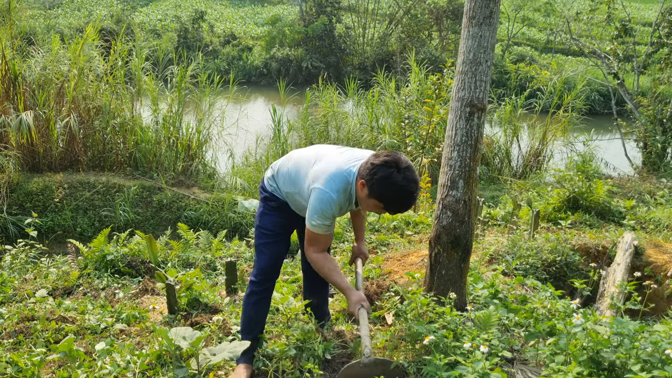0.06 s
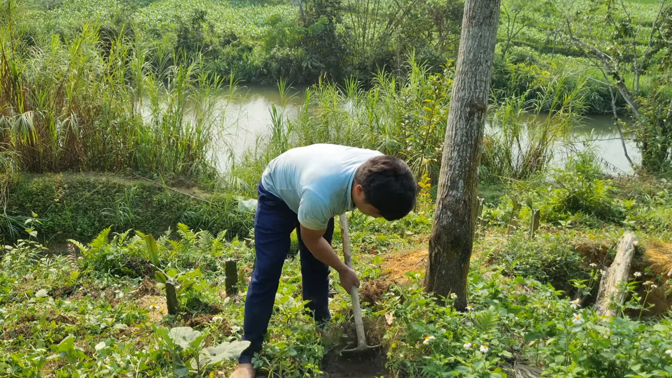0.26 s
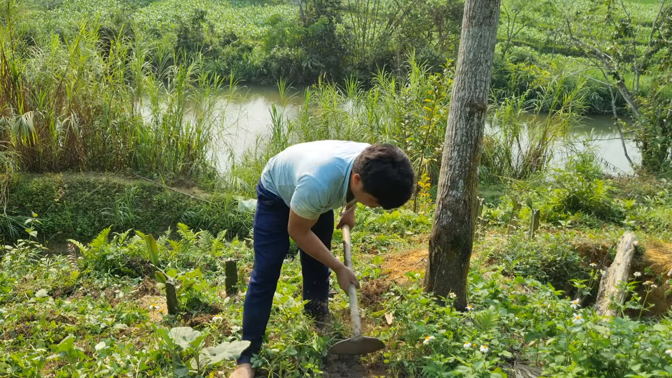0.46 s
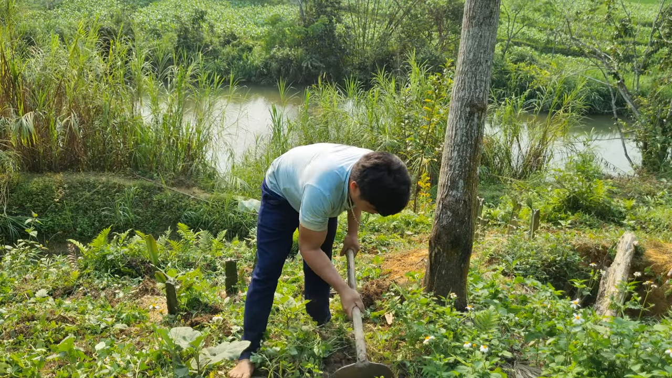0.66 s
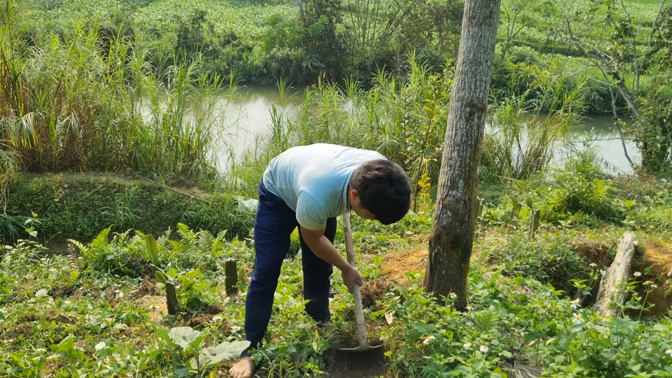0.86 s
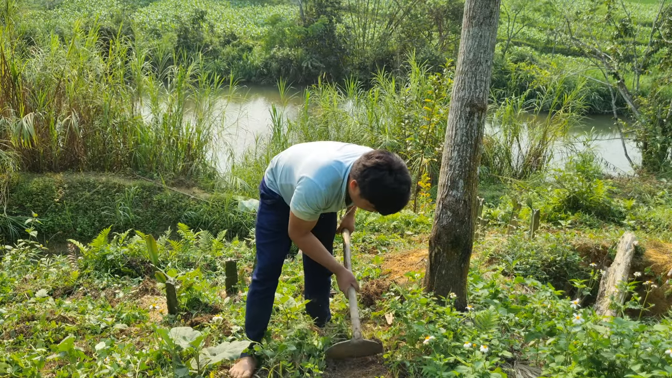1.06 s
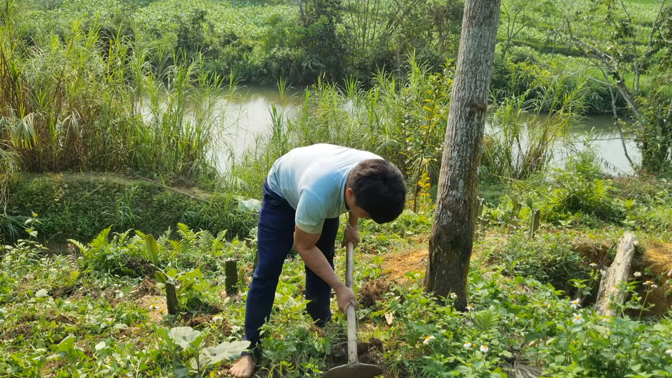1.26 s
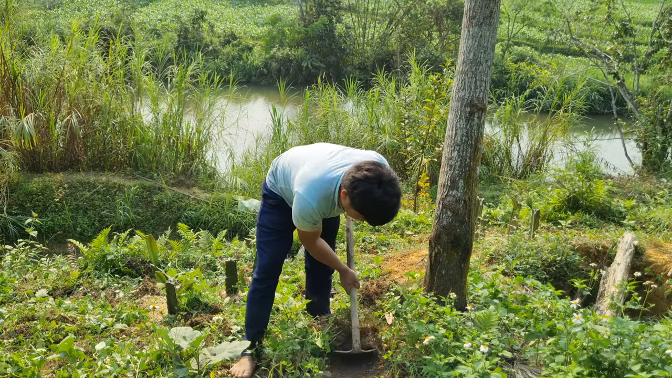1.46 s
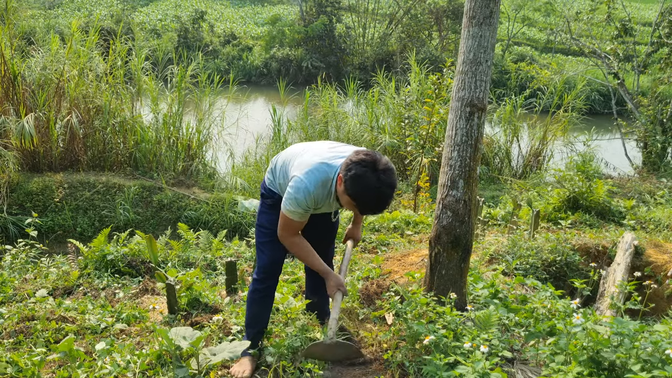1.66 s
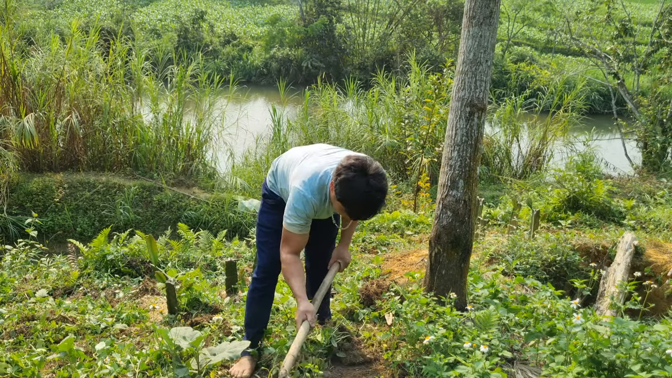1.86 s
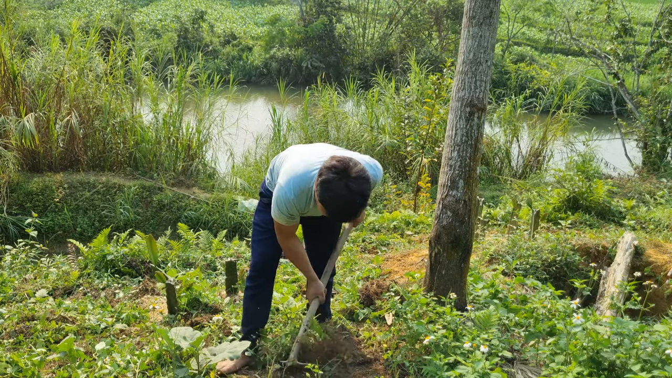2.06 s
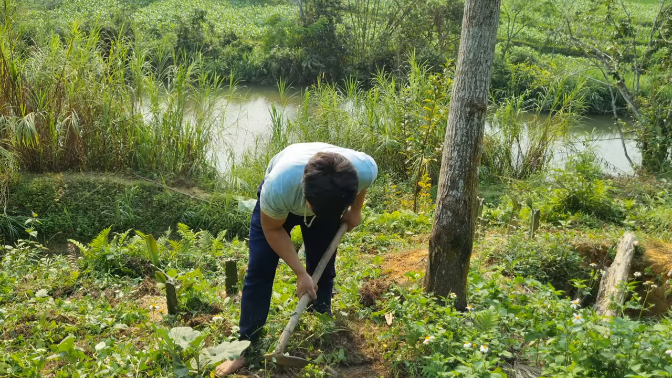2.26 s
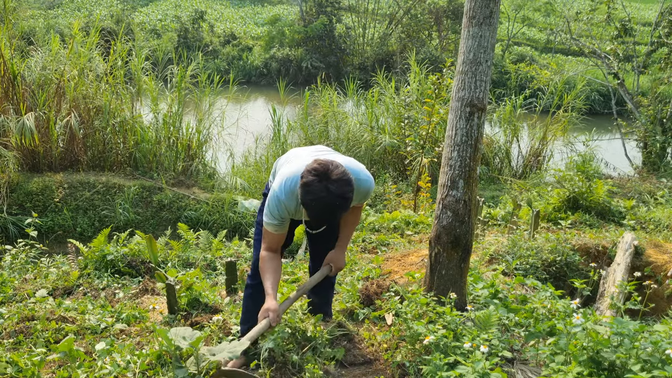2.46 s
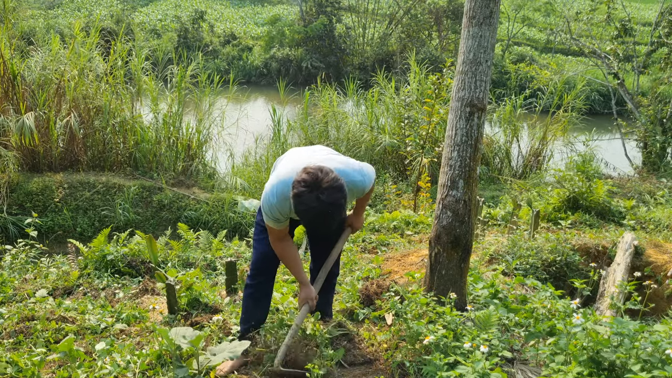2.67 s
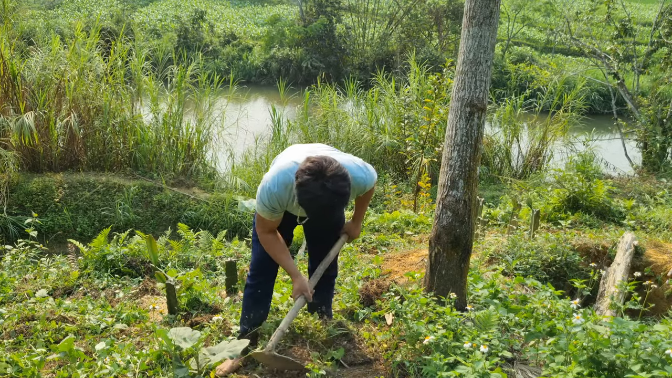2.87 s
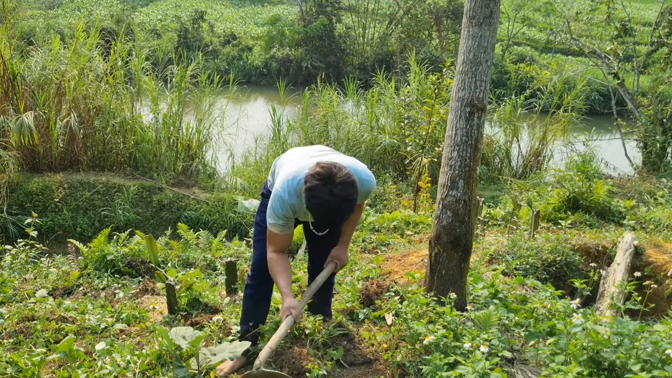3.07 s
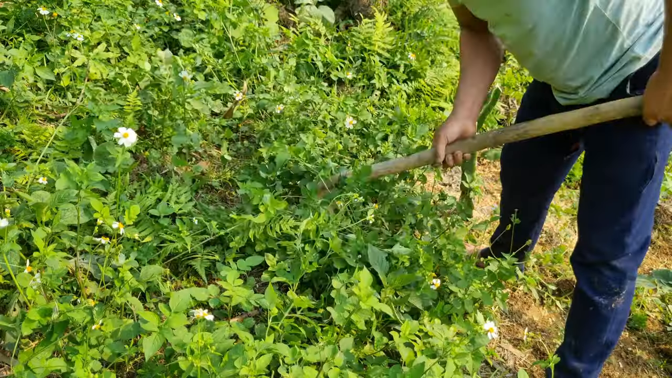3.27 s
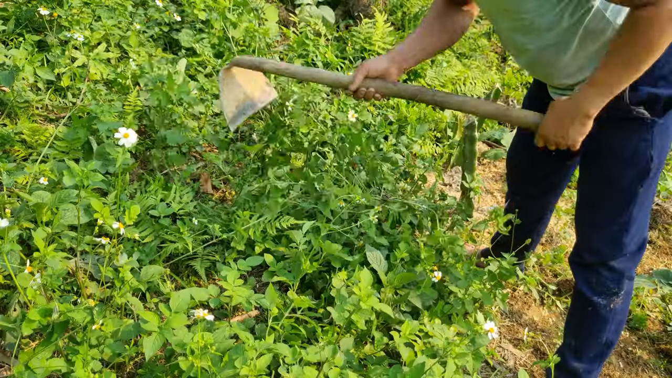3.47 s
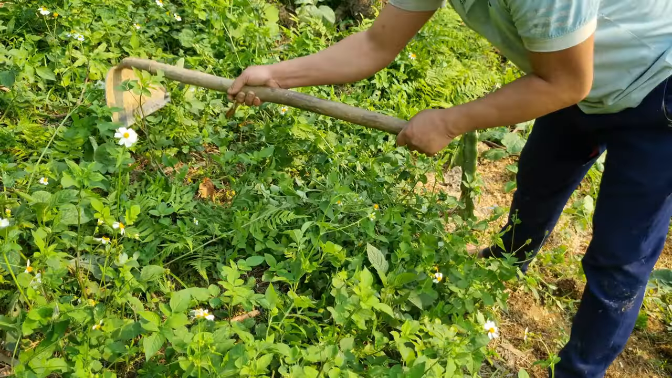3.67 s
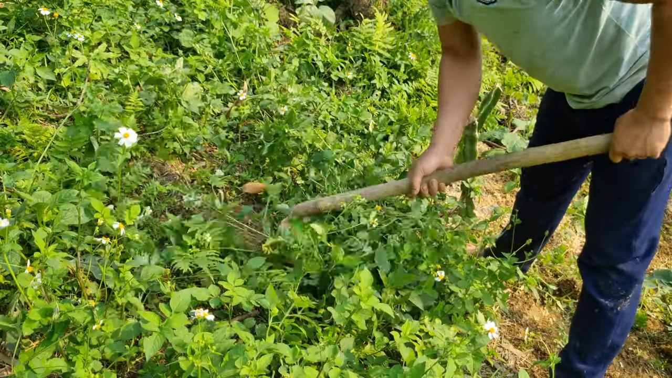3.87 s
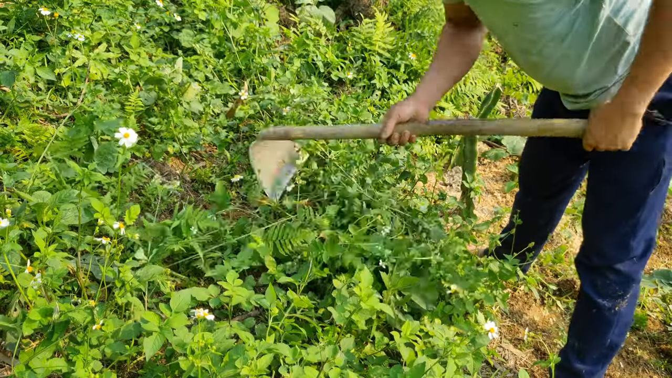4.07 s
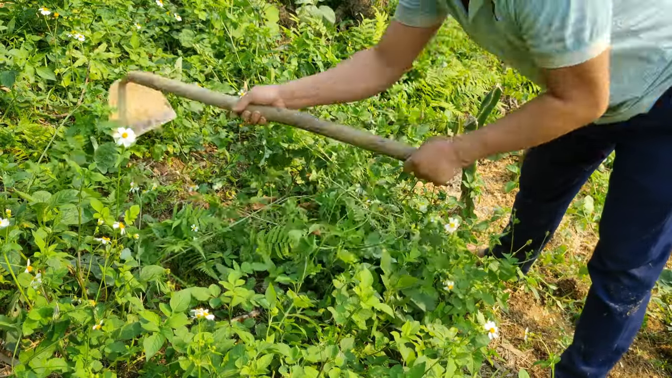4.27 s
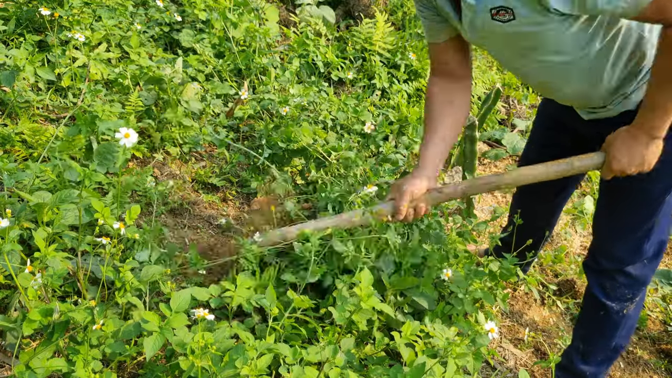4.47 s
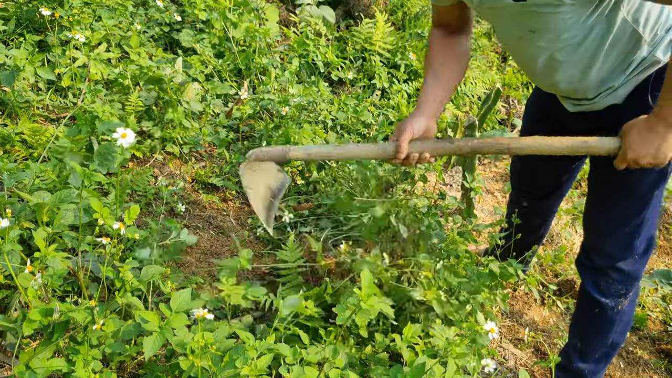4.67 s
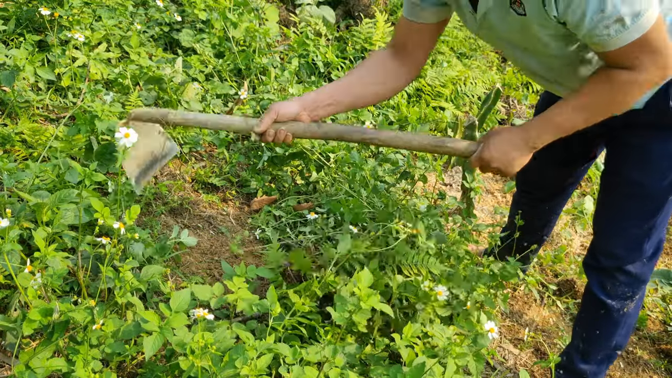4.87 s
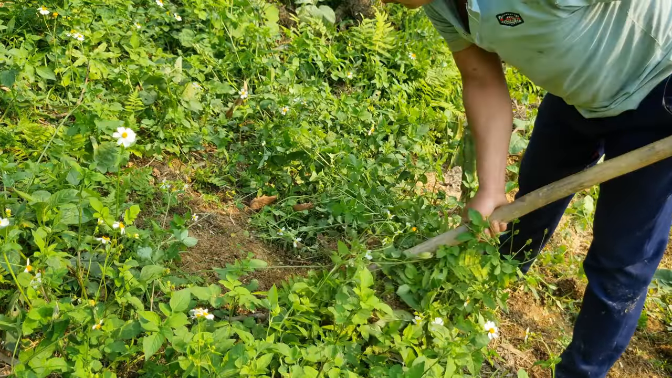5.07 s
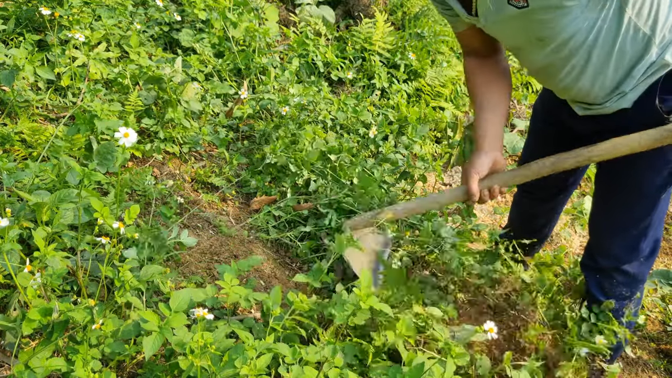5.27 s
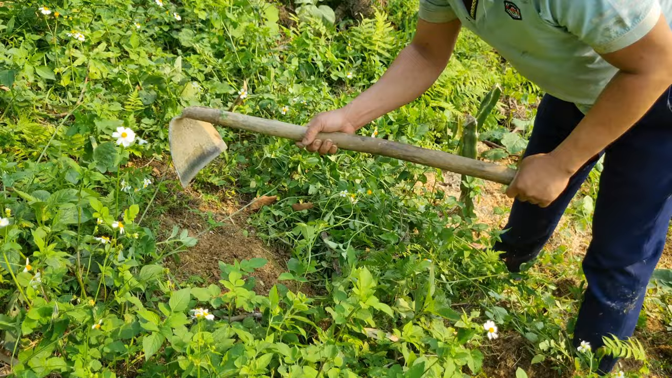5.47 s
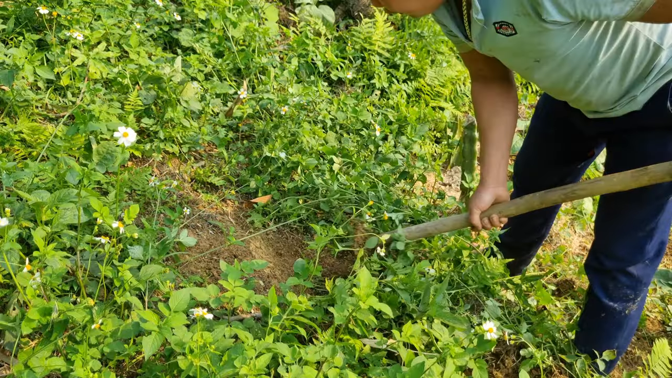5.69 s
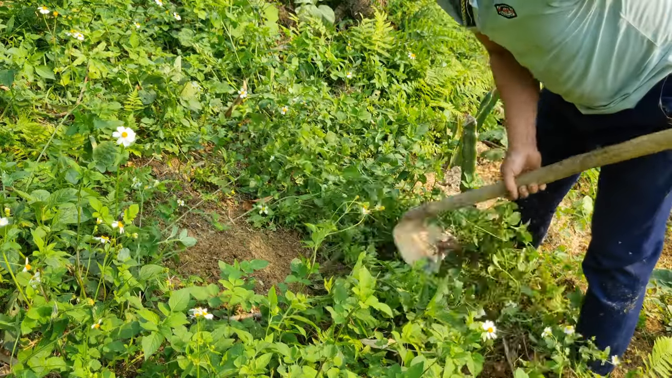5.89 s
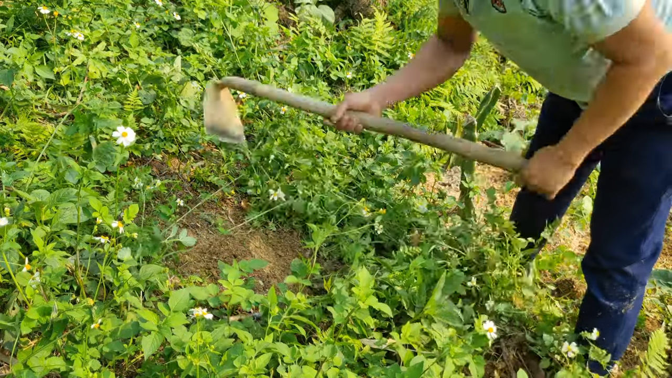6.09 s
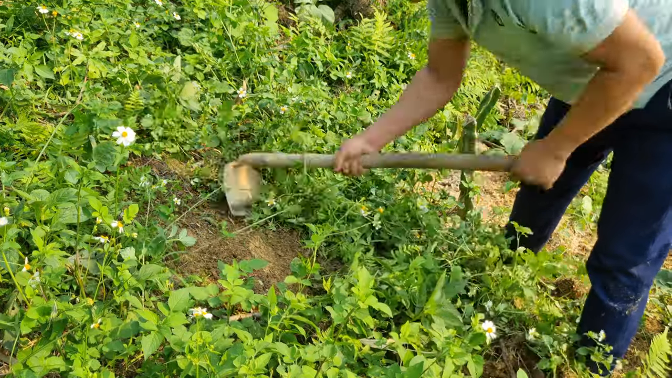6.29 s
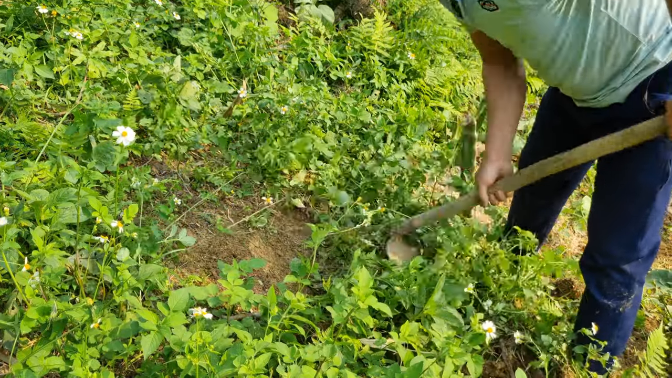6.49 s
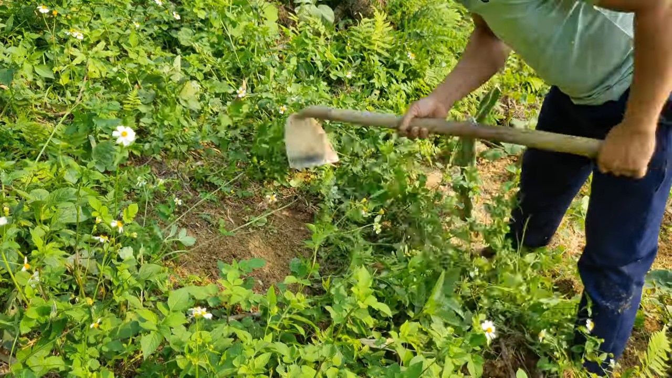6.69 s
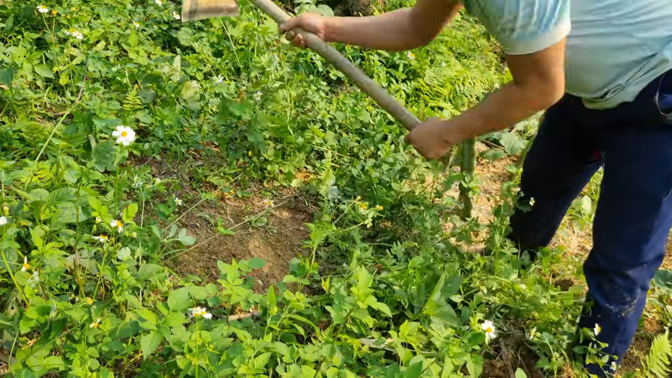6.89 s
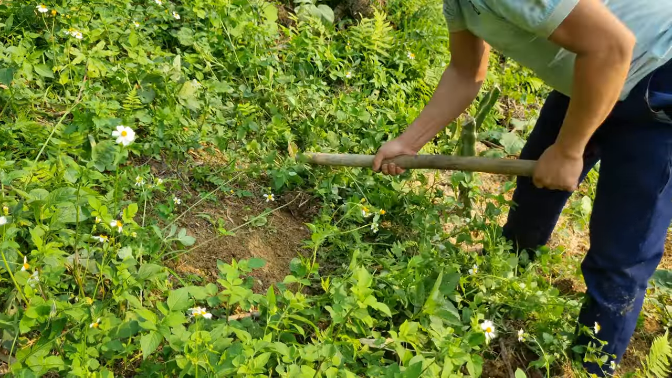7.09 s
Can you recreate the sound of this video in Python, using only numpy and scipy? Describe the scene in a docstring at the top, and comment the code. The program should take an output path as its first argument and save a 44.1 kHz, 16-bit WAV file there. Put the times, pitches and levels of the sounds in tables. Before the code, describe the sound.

Regular hoeing in open air, in wide stereo. Distant chops come first, each a short gritty crunch with a soft thud and a fading rustle, plus woody pops early on. Around three seconds the perspective jumps near, and the blows become louder, sharper and more metallic, tearing through stems and dragging soil and leaves. The last blows are strongest. Very soft breeze and thin bird notes stay in the background.

```python
"""A hoe chops twelve times into dry soil and vines in a garden, heard first from afar, then from near.
Noisy grains of grit and stems strike the steel blade and ring its modes; damped low swings thud in
the ground, and shaped noise rustles like leaves in each pull. Small hollow pops are short decaying
tones, bird notes are gliding sines, and outdoor hiss and low breeze are drifting coloured noise.
Two microphone ports, alike in the bass and less so in most of the treble, make the stereo."""
import sys
import numpy as np
from scipy import signal
from scipy.fft import rfft, irfft, next_fast_len
from scipy.io import wavfile
from scipy.ndimage import uniform_filter1d

SR = 44100
rng = np.random.default_rng(int(sys.argv[2]) if len(sys.argv) > 2 else 0)


def digitize_waveform(pressure):
    """Quantize a signal to 16-bit integers and store it at the path in sys.argv[1].

    Rows of a 2-D input are taken as channels; values are limited to [-1, 1].
    """
    field = np.atleast_2d(pressure).T
    bounded = np.clip(field, -1, 1)
    quanta = np.round(bounded * 32767).astype(np.int16)
    wavfile.write(sys.argv[1], SR, quanta)


N = 314874
NEAR_S = 3.265  # the hoe is heard from near after this time


def gain_of(db):
    """Amplitude factor of a level in dB."""
    return 10 ** (np.asarray(db) / 20)


def evened(x):
    """Scale to an RMS of one."""
    return x / np.sqrt(np.mean(x ** 2) + 1e-20)


def read(points, hz):
    """Every column of a table at the frequencies hz, on a log axis."""
    f, *columns = np.transpose(points)
    return np.squeeze([np.interp(np.log(hz + 1), np.log(f + 1), c) for c in columns])


def add(mix, s, sound):
    """Lay a sound into the mix at s seconds, cut off at the end."""
    part = mix[..., round(s * SR):][..., :sound.shape[-1]]
    part += sound[..., :part.shape[-1]]


def coloured(x, points):
    """Causal minimum-phase filter of unit energy with the given spectrum."""
    log_gain = read(points, abs(np.fft.fftfreq(4096, 1 / SR))) * np.log(10) / 20
    spectrum = np.exp(log_gain - 1j * signal.hilbert(log_gain).imag)
    taps = np.fft.ifft(spectrum).real[:2048]
    return signal.oaconvolve(x, taps / np.linalg.norm(taps))[:N]


def ring(x, hz, width):
    """One damped resonance of the given width in Hz, scaled to unit energy."""
    r, turn = np.exp(-np.pi * width / SR), 2 * np.pi * hz / SR
    strength = np.sin(turn) * np.sqrt(2 * (1 - r * r))
    return signal.lfilter([strength], [1, -2 * r * np.cos(turn), r * r], x)


def drift(count, per_s, depth_db):
    """Random gain curves with per_s new values a second, joined by straight lines."""
    steps = np.arange(0, N / SR * per_s + 2)
    gains = gain_of(depth_db * rng.standard_normal((count, len(steps))))
    return [np.interp(np.arange(N) / SR * per_s, steps, g) for g in gains]


def air():
    """Distant leaves, insects and breeze: noise with drifting patches."""
    # spectrum of the open air: (f/Hz, relative level per Hz/dB)
    air_spectrum = [(15, -42), (25, -1), (76, -11.5), (317, -11), (394, -7), (1160, -15), (1890, -7),
                    (3520, -8.5), (4490, -5), (8360, -6.5), (11900, -14.5), (14400, -9.5), (16000, -6)]
    frames, hz = N // 256 + 5, np.fft.rfftfreq(1024, 1 / SR)
    real, imaginary, patches = rng.standard_normal((frames, 513, 3)).T
    patches = uniform_filter1d(patches, size=12, axis=0)  # over frequency
    patches = evened(uniform_filter1d(patches, size=20, axis=1))  # over time
    z = (real + 1j * imaginary) * gain_of(read(air_spectrum, hz)[:, None] + 2.0 * patches)
    hiss = signal.istft(z, nperseg=1024, noverlap=768)[1][:N]
    return gain_of(-60) * evened(hiss)


def strokes():
    """Slow level of scrape, treble, weight and rumble: way in, bite, fading pull, and brushed leaves."""
    # one row a stroke: (bite t/s, way in through the leaves/s, bite length/s, scrape level/dB,
    # treble level above it/dB, crunch level above it/dB, bite t60/s, pull level/dB,
    # pull treble level above it/dB, pull t60/s, pull crunch level above it/dB)
    stroke_rows = [(0.174, 0.064, 0.02, -36.5, 1.5, -4, 0.21, -52, 8.5, 0.52, 4.5),
                   (0.786, 0.023, .005, -36, -2, -7, 0.29, -50.5, 5.5, 0.51, -11),
                   (1.357, 0.022, 0.015, -36.5, -1, 5.5, 0.1, -53.5, 4, 0.94, 2),
                   (1.949, 0.013, .01, -38, 5.5, 4, 0.26, -40.5, 3, .7, -1.5),
                   (2.569, 0.031, 0.0037, -33, 3, -2.5, 0.37, -47.5, -21, 0.77, -0.5),
                   (3.198, 0.032, 0.0069, -33.5, 1, 8.5, 0.1, -54, 4.5, 1.46, -7),
                   (3.739, 0.066, 0.0098, -33, 6, 1.5, 0.54, -39, 5, 0.68, -5),
                   (4.372, 0.068, 0.029, -31, 3.5, -3, 0.23, -52, 6.5, 3.86, -2),
                   (4.988, 0.016, 0.022, -29.5, 2, -6.5, 0.42, -41, 7, 1.41, 0.5),
                   (5.615, 0.011, 0.026, -30.5, 1.5, -7, 0.42, -42.5, 6.5, 1.57, -5.5),
                   (6.317, 0.035, 0.029, -29.5, 5, -15, 0.067, -38.5, 3.5, 0.94, -4.5),
                   (7.077, 0.049, 0.0056, -25.5, 2.5, 1.5, 0.22, -37, -12, 1., -11)]
    # leaves and stems brushed between strokes: (middle t/s, length between the -20 dB points/s,
    # scrape level/dB, treble level above it/dB)
    rustles = [(0.09, 0.24, -65, 7), (0.513, 0.44, -58.5, 1.5), (0.85, 0.079, -44.5, -3),
               (1.194, 0.2, -62, -4), (1.477, 0.069, -41.5, -8), (1.527, .12, -53.5, -4),
               (1.786, 0.15, -57.5, 2), (2.347, 0.3, -58.5, 1), (2.85, 0.29, -63, 7),
               (4.02, 0.057, -57, -8), (4.587, 0.1, -51, 3), (5.357, .3, -51, 7.5), (5.706, 0.1, -40, 9.5),
               (6.155, 0.13, -54.5, -1), (6.451, 0.11, -42.5, 0.5), (6.767, 0.35, -57, 0.5)]
    entry_db, entry_crunch = -31, 3.1  # start of the way in; the soil comes in this much more steeply
    lift_s, lift_t60 = 0.032, 0.3  # the pull dies as the hoe is about to fall again, seconds
    pull_rumble_db, rustle_crunch_db, rustle_rumble_db = -9.5, -13, -1.5  # rumble is relative to crunch
    steepness = np.array([[1], [1], [entry_crunch], [entry_crunch]])

    t, power = np.arange(0, N + 32, 32) / SR, 0
    next_bites = [row[0] for row in stroke_rows[1:]] + [N / SR + 1]
    for row, next_s in zip(stroke_rows, next_bites):
        s, entry, hold, db, treble_db, weight_db, t60, pull_db, pull_treble_db, pull_t60, soil_db = row
        way_in = entry_db * np.maximum(s - t, 0) / entry * steepness
        after = np.maximum(t - s - hold, 0)
        bite_layers = np.array([[0], [treble_db], [weight_db], [-99]])  # next to no rumble
        bite = way_in - 60 * after / t60 + db + bite_layers
        lift = np.maximum(t - next_s + lift_s, 0) / lift_t60
        pull_layers = np.array([[0], [pull_treble_db], [soil_db], [soil_db + pull_rumble_db]])
        pull = way_in - 60 * (after / pull_t60 + lift) + pull_db + pull_layers
        power = power + gain_of(bite) ** 2 + gain_of(pull) ** 2
    for s, length, db, treble_db in rustles:
        swell = db - 20 * ((t - s) / (length / 2)) ** 2
        layers = np.array([[0], [treble_db], [rustle_crunch_db], [rustle_crunch_db + rustle_rumble_db]])
        power = power + gain_of(swell + layers) ** 2
    return np.array([np.interp(np.arange(N) / SR, t, p) for p in np.sqrt(power)])


def breeze():
    """Lumpy low noise: air at the microphone, and soil shifting in each pull."""
    # spectrum of the rumble: (f/Hz, relative level/dB)
    rumble = [(25, -34), (45, -4.5), (70, 0.5), (150, -7.5), (300, -6), (600, -41.5)]
    far_db, near_db = -69, -77
    wind = gain_of(np.where(np.arange(N) < NEAR_S * SR, far_db, near_db))
    level = np.hypot(wind, strokes()[3])
    lumps = drift(1, 9., 3.5)[0]
    return level * lumps * coloured(rng.standard_normal(N), rumble)


def grains(per_s, spread_db, hiss):
    """Random clicks of uneven size in clumps, over a fine hiss."""
    wander = evened(uniform_filter1d(rng.standard_normal(N // 10 + 1), size=15))
    clumps = gain_of(2. * wander).repeat(10)[:N]
    at = np.flatnonzero(rng.random(N) < per_s / SR)
    z = rng.standard_normal(N)
    sizes = np.minimum(-np.log(1 - rng.random(N)[at]), 4)
    clicks = np.zeros(N)
    clicks[at] = np.sign(z[at]) * gain_of(spread_db * sizes)
    return evened(clumps * (evened(clicks) + hiss * z))


def contact():
    """Force of the ground on the blade in three layers: scrape, treble, weight."""
    # stones and stems that the edge hits: (t/s, scrape level/dB, treble level above it/dB,
    # crunch level above it/dB)
    knocks = [(0.176, -26, 9, 1), (0.1846, -32, -1, 5), (0.216, -26.5, 7, 2), (0.4003, -53, 13.5, -5),
              (0.5878, -46, -1, 2), (0.7873, -29.5, 2, 9.5), (0.8627, -36, 5, -32), (1.162, -51.5, 7, -20),
              (1.2032, -45, 2, -24), (1.341, -45.5, 16, 15.5), (1.3585, -38, 9, 17), (1.4688, -41, 5, -13),
              (1.7273, -43, -4, -24), (1.796, -44, -14, -9), (1.946, -29.5, 2, -19), (1.9527, -33, 25, -14),
              (2.0271, -33, 6.5, 4.5), (2.097, -34, -1.5, -27), (2.356, -43, -6, -5),
              (2.5458, -32.5, 1, -22), (2.563, -38, 13, -22), (2.5745, -20.5, 4.5, -13),
              (2.704, -37.5, 3, -20), (3.1822, -46.5, 18, -17), (3.1992, -32.5, -4, 2),
              (3.6835, -39.5, 7, -8), (3.7362, -25.5, 11.5, -19), (3.7527, -18, 6, -18),
              (4.2102, -48, -15, -19), (4.344, -30.5, -3, -18), (4.3732, -22.5, 10.5, 1),
              (4.3852, -28, 7, 3), (4.4122, -22, -1, -9), (4.4244, -25, 0, -8), (4.4339, -25.5, 6, 2),
              (4.455, -40, -3, -6), (4.7072, -39.5, -8, -14), (4.9875, -30, 4.5, 14.5),
              (5.0117, -15, -17, -15), (5.6196, -24.5, 2, 0), (5.6384, -19, 1, -15),
              (5.6512, -9.5, -1, -17), (6.1402, -35.5, -9, -13), (6.2527, -46, 10.5, -11),
              (6.3149, -17, 2, 4), (6.3483, -18, -6, -16), (6.4034, -30, 7, -29), (7.0368, -30, 10, 1),
              (7.058, -43, 14, -10), (7.0792, -10, -1.5, -19)]
    knock_t60, crumb_rise_s = 0.019, 0.00099
    shared = grains(1500, 4., .5)
    treble = evened(0.095 * shared + grains(5000, 0.85, 0.74))
    weight = evened(.5 * shared + grains(500, 3.0, 0.8))
    force = strokes()[:3] * [shared, treble, weight]

    u = np.arange(1500) / SR
    for (s, db, treble_db, weight_db), z in zip(knocks, rng.standard_normal((len(knocks), len(u)))):
        snap = 2.13 * np.exp(-u * SR)
        crumbs = 1.03 * z * (1 - np.exp(-u / crumb_rise_s))
        burst = (crumbs + snap) * gain_of(-60 * u / knock_t60)
        add(force, s, burst * gain_of([[db], [db + treble_db], [db + weight_db]]))
    return force


def patchy(x):
    """Clods and stems of changing size: the colour shifts in short random patches."""
    z = signal.stft(x, nperseg=512)[2]
    patches = uniform_filter1d(rng.standard_normal(z.T.shape), size=4, axis=0)  # over time
    patches = uniform_filter1d(patches, size=3, axis=1)  # over frequency
    gain = gain_of(3. * evened(patches).T)
    return signal.istft(z * evened(gain), nperseg=512)[1][:N]


def hoe():
    """Scrape rings the low blade modes and treble the high ones; weight crunches in the soil."""
    # spectra of the three layers: (f/Hz, relative level/dB)
    grit = [(300, -38), (800, -9.5), (1400, -5.5), (2200, -2), (3000, -3), (4200, -4.5), (6000, -7),
            (9000, -39.5)]
    leaves = [(2000, -37), (4000, -1), (6000, 1), (8000, 1.5), (9500, -1.5), (12000, -4), (14000, -1.5),
              (16000, -2)]
    soil = [(60, -39.5), (200, -8.5), (400, -14.5), (650, -1.5), (1000, -6), (1500, -11.5), (2500, -15.5)]
    # blade modes: (f/Hz, width/Hz, relative level from afar/dB, relative level from near/dB)
    blade = [(706, 410, 7, -40), (883, 27, -31, -8.5), (1300, 150, -20, -9), (1570, 150, -3.5, -23),
             (1993, 88, 0, 0.5), (2297, 140, -3, -1), (2602, 70, 0.5, 3), (3270, 130, -16, -6),
             (4610, 240, -3.5, -23), (5066, 110, 2, -7), (6400, 220, -23, -10), (7260, 160, 1, -10),
             (7820, 190, -4, -29), (8270, 330, -5, -6)]
    # the free blade sings on one mode while stems or grit slide along it:
    # (t/s, length/s, row of the blade modes, level/dB)
    sings = [(.42, .09, 1, -65), (.89, .07, 4, -60), (1.47, .09, 5, -57), (1.49, .07, 3, -56),
             (2.08, .04, 3, -53), (2.31, .06, 5, -63), (3.28, .09, 6, -56), (3.67, .07, 4, -50),
             (3.965, .115, 6, -54), (4.1, .2, 3, -67), (4.32, .045, 4, -44), (5.66, .19, 6, -45),
             (6.13, .04, 6, -55), (6.4, .05, 6, -46), (6.44, .045, 6, -41), (6.72, .1, 5, -61)]
    scrape, treble, weight = contact()
    out = gain_of(-1.0) * coloured(scrape, grit)
    out = out + gain_of(1.0) * coloured(treble, leaves)
    out = out + gain_of(-2.0) * coloured(weight, soil)
    out = patchy(out)

    power = uniform_filter1d(scrape ** 2, size=400)
    hard = power / (power + gain_of(-42.5) ** 2)  # only firm contact rings the steel; soft leaves do not
    near = round(NEAR_S * SR)
    for (hz, width, far_db, near_db), place in zip(blade, drift(len(blade), 35, 4.)):
        drive = scrape if hz < 4200 else treble
        mode = ring(drive * hard * place, hz, width)  # the point of contact wanders over the blade
        add(out, 0, gain_of(far_db - 8.5) * mode[:near])
        add(out, NEAR_S, gain_of(near_db - 9.0) * mode[near:])

    for (s, length, row, db), z in zip(sings, rng.standard_normal((len(sings), 12000))):
        size = round(length * SR)
        tone = evened(ring(z, blade[row][0], 28.)[-size:])
        add(out, s, gain_of(db) * np.hanning(size) ** .5 * tone)
    return out


def ground():
    """Each thud is a low damped swing with loose rumble in it."""
    # thuds under each blow: (t/s, level before the soft onset/dB, f/Hz, t60/s)
    thuds = [(0.181, -31.5, 195, 0.13), (0.779, -36.5, 106.5, 0.23), (1.352, -23.5, 92, 0.076),
             (1.952, -37, 267, 0.16), (2.577, -34.5, 139.4, 0.2), (3.191, -36, 171, 0.11),
             (3.752, -40.5, 81.3, 0.33), (4.388, -33, 218, 0.088), (5.001, -33, 72.5, 0.13),
             (5.649, -43, 169, 0.22), (6.319, -28.5, 79, 0.1), (7.068, -33, 187, 0.29)]
    out, u = np.zeros(N), np.arange(12000) / SR
    onset = 1 - np.exp(-u / 0.0073)
    for (s, db, hz, t60), z in zip(thuds, rng.standard_normal((len(thuds), len(u)))):
        swing = np.sin(2 * np.pi * hz * u) + 0.99 * evened(ring(z, 110, 200))
        add(out, s, gain_of(db - 60 * u / t60) * onset * swing)
    return out


def pops():
    """Short rounded rings with faint overtones and a weak rebound."""
    # hollow pops between strokes: (t/s, peak level of the envelope/dB, f/Hz)
    pop_rows = [(0.396, -53.5, 1670), (0.45, -45, 1710), (0.479, -43, 1840), (0.497, -30, 1724),
                (0.515, -52, 1640), (0.5683, -51, 1710), (0.585, -36, 1700), (1.123, -47, 1740),
                (1.203, -61, 1650), (1.655, -59, 1700)]
    rise_s, rebound_s, rebound_gain = .027 / 9, 0.0097, 0.19
    out, u = np.zeros(N), np.arange(2500) / SR
    v = u / rise_s
    envelope = (v * np.exp(1 - v)) ** 2.1  # peaks at one after rise_s
    for s, db, hz in pop_rows:
        overtones = ((1, 1), (1.9, .06), (2.9, .04))  # (frequency ratio, share)
        tone = sum(share * np.sin(2 * np.pi * k * hz * u) for k, share in overtones)
        pop = gain_of(db) * envelope * tone
        add(out, s, pop)
        for echo in range(1, 5):
            add(out, s + rebound_s * echo, rebound_gain ** echo * pop)
    return out


def bird():
    """Thin gliding whistles and quick rising chirps, made uneven by the distance."""
    # whistles: (t/s, length/s, start f/Hz, end f/Hz, level before the unevenness/dB)
    whistles = [(2.82, .03, 6400, 6450, -59), (3.055, .03, 7000, 7300, -51), (3.075, .12, 7320, 7360, -58),
                (5.46, .07, 4700, 5300, -58), (6.135, .05, 6250, 6400, -59)]
    # chirps: (t/s, start f/Hz)
    chirps = [(5.92, 4800), (6.022, 5200), (6.077, 4200), (6.096, 4900), (6.162, 4200), (6.197, 5100),
              (6.252, 4000), (6.275, 4800)]
    chirp_s, chirp_rise, chirp_db = .012, 1.3, -57  # the rise is a frequency ratio
    notes = whistles + [(s, chirp_s, hz, hz * chirp_rise, chirp_db) for s, hz in chirps]
    out = np.zeros(N)
    for s, length, hz0, hz1, db in notes:
        hz = np.linspace(hz0, hz1, round(length * SR))
        tone = np.sin(2 * np.pi * np.cumsum(hz) / SR)
        add(out, s, gain_of(db) * np.hanning(len(hz)) ** .5 * tone)
    return out * drift(1, 250., 4.)[0]


def ports(x, apart):
    """The right port hears the left sound shifted in phase, mixed with grains that only it faces."""
    # the two microphone ports: (f/Hz, likeness 0-1, left lead from afar/rad, left lead from near/rad,
    # left over right level/dB)
    port_rows = [(60, 0.98, 0.05, 0.1, 3), (497, 0.96, -0.05, 0.15, 2), (2000, 0.8, 0, 0.58, 1.5),
                 (3570, 0.42, -1.2, 1.36, 1), (4360, 0.06, .5, 8, -1.5), (6480, 0.25, .3, 2, 0),
                 (11000, 0.1, 2, 1, -4), (16550, 0.9, 2.1, 2, -3)]
    size, near = next_fast_len(N), np.arange(N) > NEAR_S * SR
    like, far_lead, near_lead, balance_db = read(port_rows, np.fft.rfftfreq(size, 1 / SR))
    tilt = gain_of(balance_db / 2)
    shifted = rfft(x * ~near, size) * np.exp(-1j * far_lead)
    shifted = shifted + rfft(x * near, size) * np.exp(-1j * near_lead)
    right = like * shifted + np.sqrt(1 - like ** 2) * rfft(apart, size)
    return irfft(np.array([rfft(x, size) * tilt, right / tilt]), size)[:, :N]


def scene():
    """Pops, bird and thuds reach both ports alike; hoe, breeze and air are drawn anew for each."""
    points = pops() + bird() + ground()
    return ports(*(points + hoe() + breeze() + air() for side in range(2)))


def record(dry):
    """The microphone loses the deepest bass; then a band limit takes the top treble."""
    thin = signal.sosfilt(signal.butter(3, 45, "high", fs=SR, output="sos"), dry)
    band_limit = signal.firwin(801, 15850, window=("kaiser", 10), fs=SR)
    return signal.oaconvolve(thin, band_limit[None], "same")


dry = scene()
out = record(dry)
digitize_waveform(out)
```